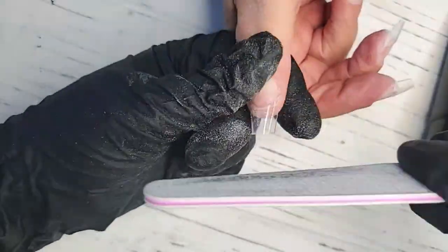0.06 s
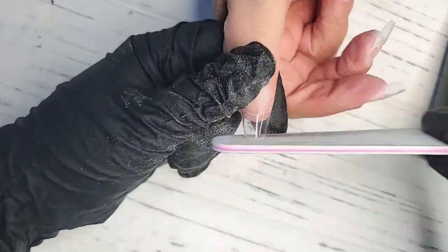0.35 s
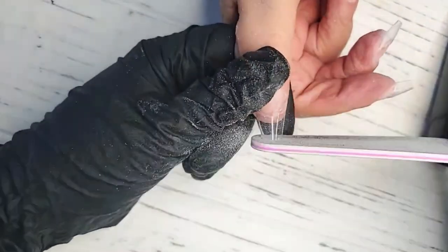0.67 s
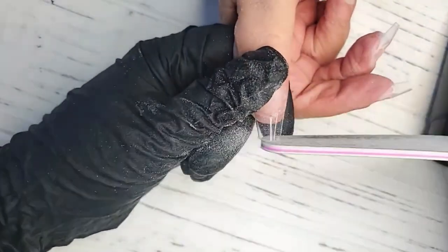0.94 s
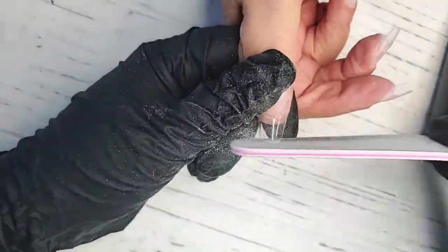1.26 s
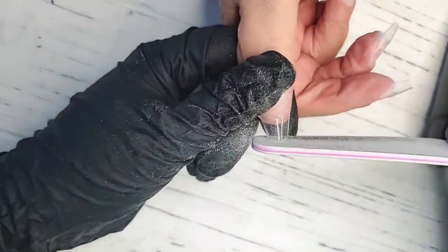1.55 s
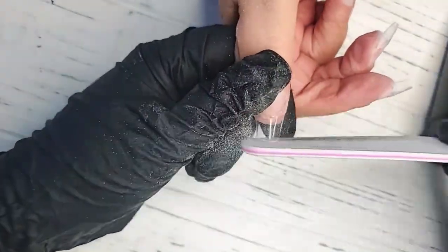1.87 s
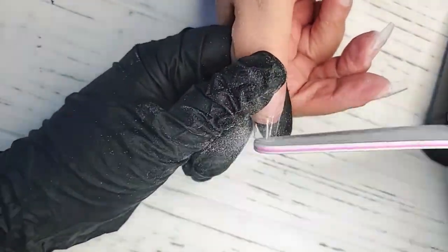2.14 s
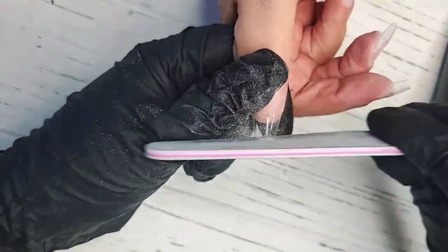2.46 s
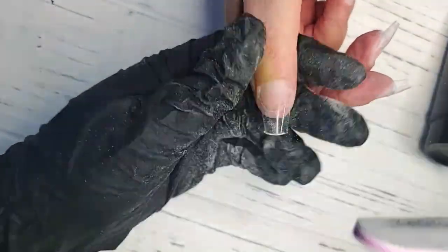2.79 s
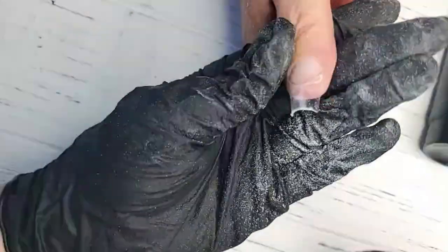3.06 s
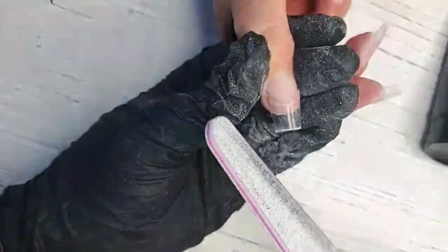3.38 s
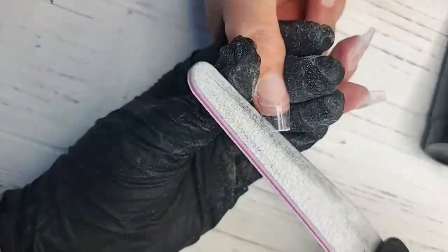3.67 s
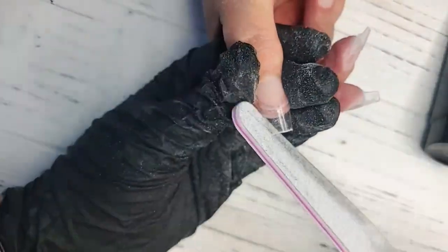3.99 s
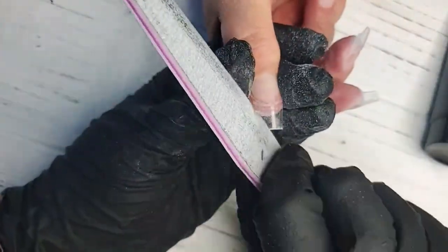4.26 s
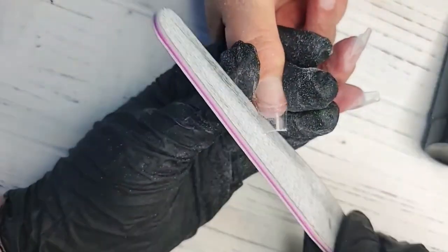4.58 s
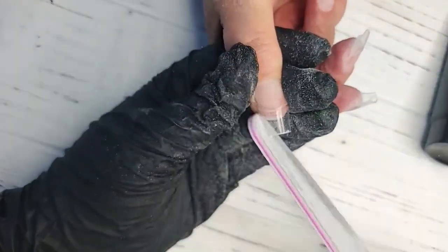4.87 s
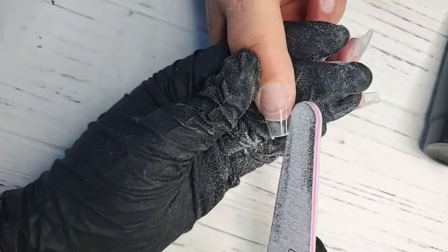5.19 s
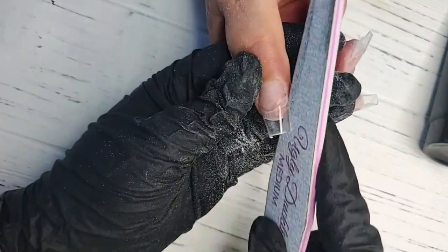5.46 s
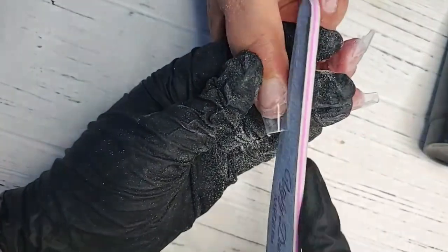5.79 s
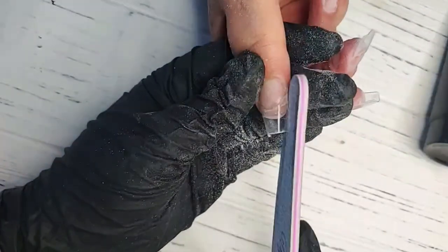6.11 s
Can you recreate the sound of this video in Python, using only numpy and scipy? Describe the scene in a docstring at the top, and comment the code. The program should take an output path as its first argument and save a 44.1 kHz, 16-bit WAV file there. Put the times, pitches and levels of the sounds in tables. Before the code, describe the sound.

In a small room with a faint rumble and a distant engine hum, a nail file rasps close by against a plastic nail in fast, even strokes. About halfway through, one hard knock on the table rings out in a pause. Softer scraping follows, breaks off briefly and resumes, dotted with sharp little ticks, light rubber glove rustle and soft bumps of hands on the table.

```python
"""A small, live room rumbles faintly, an engine humming outside. Gloves rustle and a hand file starts
to scrape back and forth across the free edge of a plastic nail tip: grit chatters, rings the plastic
and now and then catches with a tick. At 3 s something knocks on the table, and table and room ring out.
The file returns more quietly along the side of the tip, then, from 5.4 s, works round the corner.
In this second half the hands also bump softly against the table."""
import sys
import numpy as np
from scipy import signal
from scipy.fft import rfft, irfft
from scipy.io import wavfile

SR = 44100
rng = np.random.default_rng(int(sys.argv[2]) if len(sys.argv) > 2 else 0)


def dump(signal):
    """Clip the signal to [-1, 1] and save it as 16-bit WAV at the path in sys.argv[1]."""
    limited = np.clip(np.atleast_2d(signal).T, -1, 1)
    pcm = np.round(limited * 32767).astype(np.int16)
    wavfile.write(sys.argv[1], SR, pcm)


N = 279594
TIME = np.arange(N) / SR
FREQS = np.fft.rfftfreq(4096, 1 / SR) + 1

# EQ of the still room: (frequency [Hz], gain [dB])
ROOM_TONE_EQ = [(25, -21.5), (40, -8.5), (55, -1.5), (72, -2.5), (90, -9.5), (130, -9.5), (220, -12),
                (320, -25), (500, -33), (1000, -49), (3000, -52), (13000, -56)]
# the engine outside: (time [s], firing rate [Hz], level before trim [dB])
ENGINE_CURVE = [(0.0, 50.5, -51.5), (0.38, 56.06, -47.5), (1.46, 55.8, -39.5), (1.62, 64.1, -52),
                (1.84, 69.1, -41), (2.12, 72.0, -49), (2.25, 54.75, -53.5), (3.78, 53.8, -57.5),
                (4.28, 59.3, -55.5), (4.94, 54.46, -50), (5.19, 53.8, -46), (5.43, 69.3, -50.5),
                (5.97, 63.7, -54), (6.25, 64.0, -47)]
# the gloved hands on the move: (start [s], end [s], level [dB])
GLOVE_MOVES = [(0, 0.072, -67.5), (.28, 2.84, -45), (2.97, 3.23, -57.5), (3.615, 4.98, -57.5),
               (5.0, 5.15, -63.5), (5.38, 6.34, -55)]
# hands bumping the table: (time [s], peak [dB], centre [Hz])
HAND_BUMPS = [(3.354, -56.5, 2700), (4.943, -35.5, 130), (5.785, -44, 550)]

# ring of the table: (frequency [Hz], relative level [dB], t60 [s])
TABLE_MODES = [(266, -13.5, .4), (642, -1.5, .33), (672, 1.5, .33), (719, 0, .34), (778, -2.5, 0.43),
               (830, -3, 0.33), (866, -7.5, 0.45), (1188, -13, 0.39), (1230, -11, .5), (1316, -12, 0.38),
               (1710, -11.5, .35), (2238, -22, .3), (2396, -20.5, .3)]
# broad resonances the knock sends round the room: (centre [Hz], half width [Hz], gain [dB])
WASH_BANDS = [(111, 25, -15), (265.6, 40, -11), (413, 50, -18.5), (683.7, 52, -0.5), (824, 51, -4),
              (1190, 120, -10.5), (1770, 200, -15), (2350, 120, -15), (3300, 220, -25.5), (3850, 200, -24),
              (5200, 500, -38)]
# the thin, even bed under those resonances: (frequency [Hz], gain [dB])
WASH_BED_EQ = [(60, -36), (500, -30.5), (1100, -19.5), (2800, -31), (4600, -36.5), (13000, -38.5)]

# the file changes hold, edge to side and side to corner, in the pauses between runs: (time [s])
HOLD_CHANGES_S = [3.3, 5.3]
# rasp of the grit in each hold: (frequency [Hz], gain [dB])
EDGE_EQ = [(250, -15.5), (500, -15), (800, -16.5), (1150, -21.5), (1700, -16), (2400, -10), (3600, -6.5),
           (5000, -4), (6300, -2.5), (7800, 0), (9200, -1), (11000, -3.5), (12500, -0.5), (13800, -3.5)]
SIDE_EQ = [(250, -11.5), (500, -15), (800, -18), (1150, -20.5), (1700, -20.5), (2400, -12), (3600, -6.5),
           (5000, -8), (6300, -7), (7800, -6), (9200, -5), (11000, -1), (12500, 0.5), (13800, -2.5)]
CORNER_EQ = [(250, -22.5), (500, -18), (800, -24), (1150, -29.5), (1700, -25.5), (2400, -18.5), (3600, -14),
             (5000, -17), (6300, -15.5), (7800, -7.5), (9200, -8.5), (11000, -4.5), (12500, 0), (13800, -4)]
# narrow peaks and dips that give the scraping its hollow, ringing colour:
# (centre [Hz], half width [Hz], edge gain [dB], side gain [dB], corner gain [dB])
SCRAPE_COLOUR = [(1570, 150, 4.5, 7, 4), (2700, 78, -3.5, -3, -2.5), (3880, 230, 4.5, -0.5, .5),
                 (4850, 270, 1.5, 3, 5), (5440, 70, -2.5, -8, -5), (5760, 160, 5.5, 1, 6.5),
                 (6650, 200, 7, 2.5, 5), (7046, 57, -5, -0.5, 3), (7575, 150, 6, 5, 4.5),
                 (8110, 150, 7.5, 1.5, 2), (8490, 120, 3, 5.5, 4.5), (8960, 140, -3, -2, -5),
                 (9420, 200, 5, 4, -1.5), (10440, 190, 4, -3.5, 0.5), (11260, 130, 5.5, 2, 2),
                 (12150, 240, 2.5, 1.5, 0.5), (13300, 170, 0.5, 2, -1)]
# hard catches, mostly as the file lands or leaves: (time [s], peak [dB], tilt [dB/octave])
HARD_CATCHES = [(0.2933, -22, -3), (0.4377, -13, 0), (0.5313, -4, -3), (0.5535, -4, -4), (0.7682, -9, 1),
                (1.0789, -4, -2), (1.4748, -6, -2), (1.6643, -1, 3), (1.753, -8, 3), (1.7644, -12, 1),
                (1.7745, -9, -4), (1.9566, -10, 0), (1.9748, -9, -5), (2.6977, -7, 3), (3.6965, -18, -5),
                (3.7404, -12, 3), (4.187, -4, 4), (4.615, -9, 0), (4.9423, -12, -5), (5.3992, -17, -4),
                (5.428, -14, 1), (5.4538, -10, 4), (5.5681, -16, 4), (5.5922, -9, -4), (5.9786, -19, 0),
                (6.1924, -10, 4)]
# strokes, forth and back in turn within each run; a positive lean presses towards the end:
# (start [s], end [s], mid-stroke level before trim [dB], lean [dB])
STROKES = [(0.282, 0.441, -27.5, 7.5), (0.461, 0.588, -19.5, 0.5), (0.602, 0.745, -22, 0.5),
           (0.766, 0.887, -20.5, -1), (0.915, 1.051, -21.5, -1.5), (1.068, 1.192, -19.5, 2),
           (1.2, 1.331, -22.5, 3.5), (1.354, 1.477, -20.3, 2.5), (1.497, 1.635, -21.5, -2.5),
           (1.659, 1.781, -22, -5.5), (1.797, 1.932, -23, 2.5), (1.953, 2.076, -27.5, -8),
           (2.095, 2.216, -26.5, 2), (2.238, 2.34, -28.5, 1.5), (2.358, 2.491, -26.5, 5),
           (2.509, 2.618, -25, 2), (2.638, 2.763, -22, 0.5), (3.676, 3.9, -29, 4), (3.911, 4.089, -33, 0.5),
           (4.132, 4.358, -25, 1.5), (4.352, 4.531, -29, 0.5), (4.573, 4.783, -24, -1),
           (4.795, 5.007, -28.5, 0), (5.023, 5.126, -40.5, -4), (5.382, 5.57, -29.5, 0),
           (5.604, 5.764, -30.5, -0.5), (5.793, 5.95, -28, 1.5), (5.993, 6.123, -32, -3),
           (6.163, 6.333, -28, -1)]
# how the file bears on the tip in each hold, one row forth and one back: (entry [dB re mid-stroke],
# exit [dB re mid-stroke], chatter [relative], tip ring [dB], tilt [dB/octave], board drum [dB])
BEARING = {"edge": [(-13, -16.5, 2.2, -4, .3, 6), (-4.5, -7.5, 1.8, 1.5, -0.92, -4)],
           "side": [(-17, -17.5, 2.1, .8, .15, 1.3), (-12, -17, 0.898, 1, -.15, 1.5)],
           "corner": [(-12, -15.5, 3.12, -3.5, 0.27, 7), (-9.5, -18.5, 1, -4, -1.1, -7)]}
# the usual stroke in each hold: (level [dB])
USUAL_STROKE_DB = {"edge": -21, "side": -29, "corner": -30}
# each dB of extra pressure rings the tip more and dulls the rasp:
# (tip ring [dB], tilt [dB/octave], board drum [dB])
TONE_PER_PRESSURE_DB = (.25, -0.0366, 0)


def undb(db):
    """Decibels to gain."""
    return 10 ** (np.asarray(db) / 20)


def unit(x):
    """Normalise to rms 1."""
    return x / np.sqrt(np.mean(x ** 2) + 1e-18)


def eq_curve(points):
    """Join (frequency [Hz], gain [dB]) points on a log-frequency axis."""
    hz, db = np.transpose(points)
    return np.interp(np.log(FREQS), np.log(hz), db)


def bell(hz, width_hz):
    """An EQ bell of height 1."""
    return np.exp(-.5 * ((FREQS - hz) / width_hz) ** 2)


def response(eq_db):
    """Minimum-phase impulse response of an EQ curve, at unit energy."""
    cepstrum = irfft(np.log(undb(eq_db)))
    half = len(cepstrum) // 2
    cepstrum[1:half] *= 2
    cepstrum[half + 1:] = 0
    impulse = irfft(np.exp(rfft(cepstrum)))
    return impulse / np.linalg.norm(impulse)


def through(x, impulse):
    """Play a sound through an impulse response."""
    return signal.fftconvolve(x, impulse)[:len(x)]


def hiss(eq_db, count):
    """Coloured noise of rms 1."""
    return unit(through(rng.standard_normal(count), response(eq_db)))


def flicker(rate):
    """Random modulator of rms 1, with rate new targets a second."""
    return unit(np.interp(TIME * rate, np.arange(N), rng.standard_normal(N)))


def decay(t, t60):
    """Envelope that falls 60 dB in t60 seconds."""
    return np.exp(-np.log(1000) * t / t60)


def add(out, s, x):
    """Mix x into out from time s."""
    i = int(s * SR)
    out[i:i + len(x)] += x[:N - i]


def room_tone(level_db=-53, waver_db=2.5):
    """The bed: a low, gently wavering rumble of still air."""
    return undb(level_db) * hiss(eq_curve(ROOM_TONE_EQ), N) * undb(waver_db * flicker(8.8))


def engine(drift_hz=1.5, waver_db=1.0, trim_db=-1.0):
    """An engine beyond the walls hums unsteadily at its firing rate."""
    times, rates, levels = np.transpose(ENGINE_CURVE)
    firing_hz = np.interp(TIME, times, rates) + drift_hz * flicker(11)
    hum = np.sin(2 * np.pi * np.cumsum(firing_hz) / SR)
    gain = undb(np.interp(TIME, times, levels) + trim_db)
    return unit(hum * undb(waver_db * flicker(8.8))) * gain


def room_reverb(x, wet_db=-14, t60=0.51, predelay_s=0.011, early_db=-15):
    """Early echoes off the table and things on it, then the tail of a small, hard-walled room."""
    t = TIME[:SR]
    tail = rng.standard_normal(len(t)) * decay(t, t60) * np.clip(t / predelay_s - 1, 0, 1)
    echoes = undb(wet_db) * tail / np.linalg.norm(tail)
    for lag_s in (.0023, .0034, .0052):
        echoes[int(lag_s * SR)] += undb(early_db)
    return x + through(x, echoes)


def gloves(crinkle_db=3, attack_s=0.027, release_t60=0.48):
    """Thin rubber rustles softly while the hands move and dies away when they rest."""
    rustle = hiss(eq_curve([(150, -7), (1000, -7), (3500, -2), (8000, -3.5), (13000, -5), (16000, -24)]), N)
    envelope = np.zeros(N)
    for start, end, db in GLOVE_MOVES:
        attack = np.clip((TIME - start) / attack_s, 0, 1)
        release = decay(np.maximum(TIME - end, 0), release_t60)
        envelope = np.maximum(envelope, undb(db) * attack * release)
    return unit(rustle * undb(crinkle_db * flicker(250))) * envelope


def hand_bumps(t60=0.051):
    """Padded by the gloves, each bump on the table is a short, dull puff."""
    out, t = np.zeros(N), TIME[:8192]
    for s, db, hz in HAND_BUMPS:
        eq_db = 20 * np.log10(bell(hz, width_hz=300) + .01)
        puff = hiss(eq_db, len(t)) * decay(t, t60)
        add(out, s, puff * undb(db) / np.abs(puff).max())
    return out


def knock(at_s=2.9792, thud_hz=765, thud_db=1.5, crack_db=-19, ring_db=-25, wash_db=-22):
    """A hard blow: a few strong cycles of the table top, a crack, then its ring and the room's wash."""
    out, t = np.zeros(N), TIME[:SR]
    swell = t / .0023  # the thud's envelope peaks at 2.3 ms
    thud = -swell ** 2 * np.exp(2 * (1 - swell)) * np.sin(2 * np.pi * thud_hz * t)
    crack_eq = eq_curve([(100, -10), (270, -4.5), (500, -12), (1100, -5.5), (1750, 5.5),
                         (3000, -19.5), (4100, -5), (6000, -16), (13000, -26.5)])
    crack = hiss(crack_eq, len(t)) * decay(t, t60=.026)
    ring = sum(undb(db) * np.sin(2 * np.pi * hz * t + rng.uniform(0, 2 * np.pi)) * decay(t, t60)
               for hz, db, t60 in TABLE_MODES)
    bands = sum(undb(db) * bell(hz, width) for hz, width, db in WASH_BANDS)
    wash_eq = 20 * np.log10(undb(eq_curve(WASH_BED_EQ)) + bands)
    wash = hiss(wash_eq, len(t)) * decay(t, t60=.49)
    build_up = 1 - np.exp(-t / .0021)
    tail = (undb(ring_db) * ring + undb(wash_db) * wash) * build_up
    add(out, at_s, undb(thud_db) * thud + undb(crack_db) * crack + tail)
    return out


def hold_at(s):
    """Which hold the file is in: 0 on the edge, 1 on the side, 2 on the corner."""
    return int(np.searchsorted(HOLD_CHANGES_S, s))


def contact(s, ring_db, tilt_db, board_db):
    """Voice of the contact: the hold, how freely the tip rings, how much the file's board drums."""
    hold = hold_at(s)
    rasp = eq_curve([EDGE_EQ, SIDE_EQ, CORNER_EQ][hold])
    colour = sum(gains[hold] * bell(hz, width) for hz, width, *gains in SCRAPE_COLOUR)
    body = ring_db * bell(7460, 1200) + board_db * bell(400, 365)
    tilt = tilt_db * np.log2(np.maximum(FREQS, 250) / 7000)
    # so small a body radiates neither deep bass nor the very top
    roll_off = 10 * np.log10((1 + (130 / FREQS) ** 4) * (1 + (FREQS / 14500) ** 20))
    return response(rasp + colour + body + tilt - roll_off)


def lesser_catches(per_stroke=2, above_db=9, scatter_db=2.0, tilt_scatter_db=3.5):
    """Coarse grains near mid-stroke, as strong as its pressure: (time [s], peak [dB], tilt [dB/octave])."""
    rows = []
    for start, end, db, _ in STROKES:
        times = start + rng.uniform(1 / 4, 3 / 4, per_stroke) * (end - start)
        for s, (size, tone) in zip(times, rng.standard_normal((per_stroke, 2))):
            rows.append((s, db + above_db + scatter_db * size, tilt_scatter_db * tone))
    return rows


def catches():
    """The tip snaps free of a coarse grain and rattles briefly against the grit."""
    out, t = np.zeros(N), TIME[:2048]
    # the tip alone is too small to carry a tick's lows
    low_cut = signal.butter(2, 2700, "high", fs=SR, output="sos")
    for s, db, tilt_db in list(HARD_CATCHES) + lesser_catches():
        force = .33 * rng.standard_normal(len(t)) * decay(t, t60=.011)
        force[0] += 1  # the snap at the head of the rattle
        tick = through(force, contact(s, ring_db=2, tilt_db=tilt_db, board_db=-12))
        tick = signal.sosfilt(low_cut, tick)
        add(out, s, tick * undb(db) / np.abs(tick).max())
    return out


def shaped_strokes():
    """Hold, direction and pressure give each stroke its dynamics, chatter and tone."""
    for hold, name in enumerate(BEARING):
        run = [row for row in STROKES if hold_at(row[0]) == hold]
        for k, (start, end, db, lean_db) in enumerate(run):
            entry_db, exit_db, chatter, *tone = BEARING[name][k % 2]
            levels = (db + entry_db - lean_db, db, db + exit_db + lean_db)
            pressure_db = db - USUAL_STROKE_DB[name]
            tone = np.array(tone) + pressure_db * np.array(TONE_PER_PRESSURE_DB)
            yield start, end, levels, chatter, tone


def stroke_envelope(t, start, end, levels, touch_s=0.0081, trim_db=-0.88, graze_db=-23):
    """The hand speeds up and slows down, so the level follows an arch."""
    entry_db, mid_db, exit_db = levels
    place = np.minimum(2 * (t - start) / (end - start) - 1, 1)  # -1 at entry, +1 at exit
    foot_db = np.where(place < 0, entry_db, exit_db)
    arch_db = mid_db + (foot_db - mid_db) * np.abs(place) ** 2.53
    # a stroke that enters gently also takes longer to bite
    bite_s = touch_s * max(.5, (mid_db - entry_db - 8.5) / 2)
    touch = np.clip(np.minimum((t - start) / bite_s, (end - t) / touch_s), 0, 1)
    # the file keeps grazing the tip while the hand turns
    graze = undb(mid_db + graze_db) * (t > (start + end) / 2)
    return np.hypot(touch * undb(arch_db + trim_db), graze)


def filing(grains_per_s=20000, grain_db=2.5, chatter_db=0.81, sway_db=0.5, turn_s=0.024, sweep_db=4.0):
    """Each stroke drags a dense stream of grains over the tip, bunched where the file sticks and slips."""
    out = np.zeros(N)
    hits = rng.random(N) < grains_per_s / SR
    grains = hits * rng.choice([-1, 1], N) * undb(grain_db * rng.standard_normal(N))
    slips, sway = flicker(rate=1100), flicker(rate=90)
    for start, end, levels, chatter, (ring_db, tilt_db, board_db) in shaped_strokes():
        span = slice(int(start * SR), int((end + turn_s) * SR))
        t = TIME[span]
        bunching = undb(chatter_db * chatter * slips[span] + sway_db * sway[span])
        force = unit(grains[span] * bunching) * stroke_envelope(t, start, end, levels)
        # the contact travels along the board, so the tip's ring crossfades over the stroke
        travel = np.linspace(0, 1, len(t))
        swing_db = sweep_db * rng.standard_normal()
        for share, shift_db in ((1 - travel, swing_db), (travel, -swing_db)):
            voice = contact(start, ring_db + shift_db, tilt_db, board_db)
            add(out, start, signal.fftconvolve(force * share, voice))
    return out


def scene():
    """Mono mix: file and bumps feed the reverb; gloves, knock and background join after it."""
    close_up = room_reverb(filing() + catches() + hand_bumps())
    return (close_up + gloves() + knock() + engine() + room_tone())[None]


def record(dry, top_hz=13850):
    """Soft-clip the loudest peak and cut the top steeply."""
    rounded = dry / (1 + dry ** 6) ** (1 / 6)
    high_cut = signal.ellip(10, .2, 70, top_hz, fs=SR, output="sos")
    return signal.sosfilt(high_cut, rounded)


dry = scene()
out = record(dry)
dump(out)
```